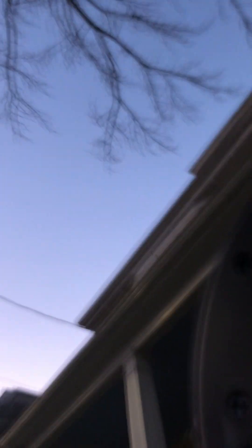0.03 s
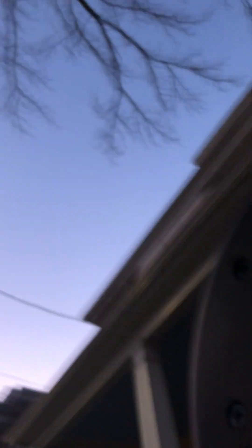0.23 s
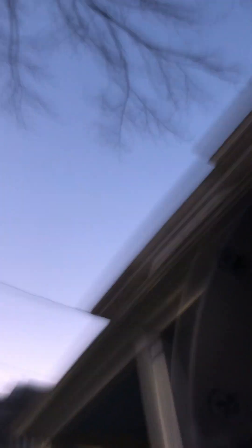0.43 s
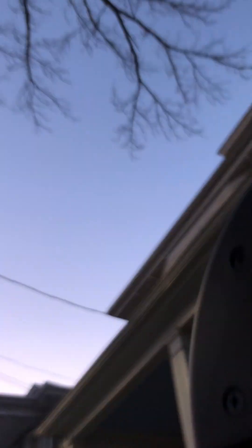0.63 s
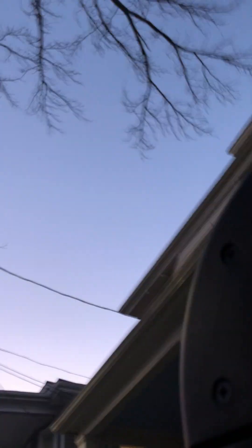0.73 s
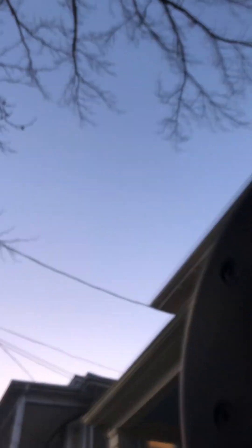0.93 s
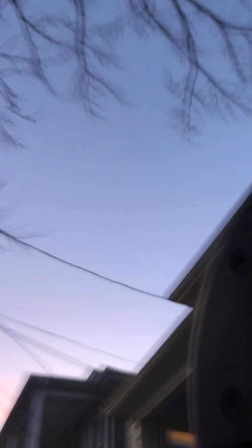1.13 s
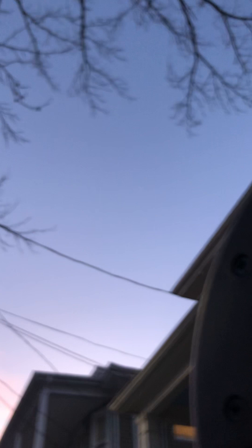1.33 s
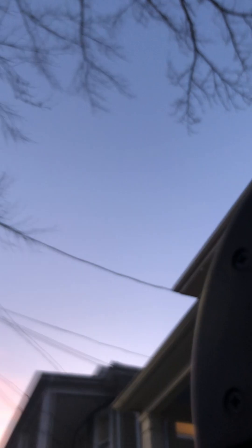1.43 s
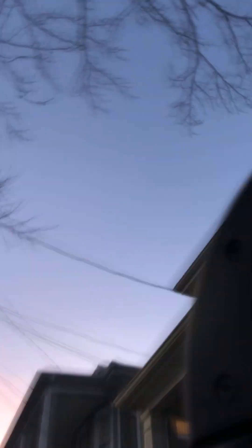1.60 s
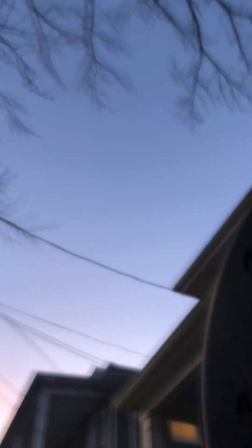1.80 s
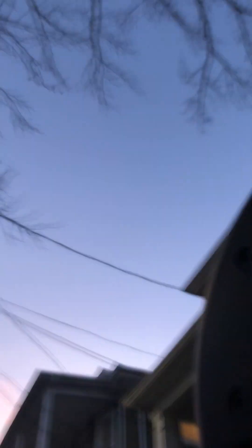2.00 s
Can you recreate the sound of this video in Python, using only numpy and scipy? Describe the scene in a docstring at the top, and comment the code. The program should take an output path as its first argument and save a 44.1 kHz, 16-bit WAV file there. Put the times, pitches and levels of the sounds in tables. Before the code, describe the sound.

A wheelchair rolls over rough pavement, close and dry, in quiet outdoor air. Low rumble carries rapid dull thuds from 0.1 to 0.5 s, with a sharp cluster of grit snaps near 0.37. A bright metal tick at 0.6, thud and loose clack at 0.8, then calmer rolling; a lighter rattle at 1.19. Snaps and ticks return around 1.6, hollow knocks from 1.73, heavy thuds near 1.95.

```python
"""A wheelchair rolls over rough pavement outdoors, heard from the chair itself.
Bumps are sinking tones with shudder, over a low rumble of coloured noise. Grit crackles and snaps,
wheels knock hollowly, small parts tick and two loose fittings clack as sums of decaying modes.
A faint squeak is a swelling tone. Quiet outdoor air and a brief scatter of echoes surround it."""
import sys
import numpy as np
from scipy import signal
from scipy.fft import rfft, irfft
from scipy.io import wavfile

SR = 44100
rng = np.random.default_rng(int(sys.argv[2]) if len(sys.argv) > 2 else 0)


def inscribe(sig):
    """Save sig as 16-bit PCM at rate SR to the path in sys.argv[1].

    A 1-D sig is mono; a 2-D sig holds one channel per row.
    Samples are clipped to [-1, 1] before scaling.
    """
    pcm = np.round(np.clip(np.atleast_2d(sig).T, -1, 1) * 32767)
    wavfile.write(sys.argv[1], SR, pcm.astype(np.int16))


N = 90493
TIME_S = np.arange(N) / SR

# Rolling rumble strength. Each row: time in seconds, level in dB.
ROLL_LEVEL = [(0, -31), (.06, -40.5), (.2, -34), (.46, -37.5), (.54, -42), (.72, -35.5), (.88, -45),
              (1.0, -35.5), (1.16, -49), (1.37, -48.5), (1.47, -39.5), (1.53, -45), (1.65, -41.5),
              (1.88, -37.5), (2.05, -39)]
# Rumble spectrum. Each row: frequency in Hz, relative level in dB.
RUMBLE_SPECTRUM = [(20, -103), (40, -9.5), (60, 13), (100, 2), (170, -1), (300, -16.5), (600, -27),
                   (1200, -61.5), (16000, -98)]

# Fine crackle strength, before clumping. Each row: time in seconds, level in dB.
CRACKLE_LEVEL = [(0, -69.5), (.1, -60.5), (.23, -63.5), (.27, -61), (.345, -75.5), (.375, -54), (.405, -61),
                 (.425, -60), (.49, -62.5), (.56, -62.5), (.66, -67.5), (.88, -69.5), (.96, -61),
                 (1.02, -70), (1.11, -59.5), (1.28, -70.5), (1.44, -63.5), (1.56, -74), (1.63, -59),
                 (1.80, -67.5), (1.87, -56), (1.96, -61.5), (2.05, -59.5)]
# Spectrum of hiss, snaps and cracks. Each row: frequency in Hz, relative level in dB.
GRIT_SPECTRUM = [(300, 19.5), (900, 5.5), (2500, 6.5), (4000, 5.5), (7000, 0.5), (10000, -1),
                 (16000, -13.5)]
# Grit snapping under the tyres. Each row: start in seconds, level in dB, resonance in Hz.
SNAPS = [(.0670, -36, 11100), (0.079, -33.5, 4850), (0.0966, -36.5, 9000), (0.122, -43, 9000),
         (.1900, -49, 5500), (0.261, -43, 3020), (.2690, -41.5, 5100), (0.274, -38, 4900),
         (0.3576, -26, 3120), (0.362, -27, 2650), (.3682, -20.5, 9500), (0.375, -26.5, 2820),
         (0.3759, -31, 3150), (0.387, -32, 2500), (0.3905, -38.5, 2290), (0.4417, -33, 8500),
         (.4562, -38, 6100), (0.4685, -38.5, 7850), (0.526, -37.5, 6050), (0.5399, -32, 5500),
         (0.545, -34.5, 2230), (.5746, -57, 9000), (0.635, -43.5, 2960), (1.07, -40.5, 5000),
         (1.0887, -42, 4000), (1.482, -45.5, 5030), (1.5494, -43.5, 4170), (1.6117, -28.5, 7350),
         (1.6334, -37, 6440), (1.6613, -36, 3500), (1.6895, -32, 4070), (1.8410, -34.5, 4300),
         (1.854, -32, 1600), (1.8705, -38, 6200), (1.9142, -36.5, 3700), (1.953, -48, 6900)]

# Hollow knock spectrum. Each row: frequency in Hz, relative level in dB.
KNOCK_SPECTRUM = [(200, 3), (500, 6), (680, 5.5), (860, 4), (1050, -3.5), (1270, 2.5), (1550, -7.5),
                  (3500, -17.5), (16000, -59)]
# Hollow knocks of the wheels. Each row: start in seconds, level in dB, resonance in Hz.
KNOCKS = [(0.312, -47.5, 900), (.3495, -40, 635), (0.417, -43, 610), (0.575, -40, 432), (0.693, -42.5, 920),
          (1.108, -35, 1110), (1.3315, -45.5, 574), (1.7303, -35, 950), (1.8171, -37.5, 1130),
          (1.857, -39, 840), (1.877, -48, 1050)]

# Outdoor air spectrum. Each row: frequency in Hz, relative level in dB.
AIR_SPECTRUM = [(30, -8), (300, -5), (900, 13), (1400, 3), (2200, -8), (5000, -21.5), (16000, -20.5)]

# Bumps through the frame. Each row: start in seconds, level in dB, starting pitch in Hz,
# decay time constant in seconds.
BUMPS = [(0.077, -23.5, 232, 0.011), (0.136, -15.5, 492, 0.0057), (0.151, -19, 121, 0.022),
         (0.182, -20.5, 160, 0.014), (0.2, -16.5, 226, 0.0098), (.212, -24, 100, 0.0073),
         (.273, -30, 350, 0.0085), (0.323, -23, 81, 0.013), (0.3472, -18.5, 338, 0.0098),
         (.392, -23, 90.4, 0.012), (0.445, -20, 251, 0.013), (0.462, -20.5, 102.6, 0.01),
         (0.624, -20, 215, 0.014), (0.636, -19.5, 221, 0.014), (0.73, -30, 255, 0.025),
         (0.803, -17.5, 100.4, 0.014), (0.939, -24.5, 236, 0.0058), (0.951, -28.5, 172, 0.019),
         (0.992, -27, 212, 0.012), (1.1829, -27.5, 416, 0.0095), (1.215, -29.5, 117.4, 0.024),
         (1.272, -29.5, 390, 0.0086), (1.284, -28, 85, 0.02), (1.569, -30, 162, 0.0056),
         (1.59, -28, 120, 0.021), (1.613, -26.5, 68.4, 0.018), (1.73, -34, 118.5, 0.049),
         (1.819, -34, 101, 0.038), (1.926, -29.5, 314, 0.012), (1.938, -17.5, 107.4, 0.018),
         (1.963, -28.5, 262, 0.011), (1.971, -15, 111, 0.0084), (2.005, -29, 109, 0.036)]

# Small metal parts ticking. Each row: start in seconds, level in dB.
TICKS = [(.4485, -33.5), (.5957, -19.5), (.6022, -38), (1.6236, -25.5), (1.6262, -29.5)]
# Modes of the parts, before each blow's slight flattening. Each row: nominal frequency in Hz,
# relative level in dB, 60 dB decay time in seconds.
PIN_MODES = [(5200, -5.5, 0.0025), (5640, -2, 0.004), (7000, -0.5, 0.0017), (10370, -9.5, 0.0049),
             (12200, -3, 0.0024), (15100, -10, 0.0021)]

# Blows on the loose bracket. Each row: start in seconds, level in dB.
BRACKET_HITS = [(.8096, -21.5), (.8278, -52.5)]
# Bracket modes. Each row: nominal frequency in Hz, relative level in dB, 60 dB decay in seconds.
BRACKET_MODES = [(931, -2.5, 0.022), (1436, -6.5, 0.015), (1946, 0, 0.014), (2540, -7, 0.013),
                 (3800, 4.5, 0.009), (4140, 7.5, 0.0053), (4840, -6.5, 0.017), (5350, -5.5, 0.0099),
                 (6100, -0.5, 0.0051), (7310, -10.5, 0.013), (11000, -14, 0.0031)]

# Blows on the loose footrest. Each row: start in seconds, level in dB.
FOOTREST_HITS = [(1.1891, -27.5), (1.1942, -39.5), (1.2008, -45.5), (1.2273, -49)]
# Footrest modes. Each row: nominal frequency in Hz, relative level in dB, 60 dB decay in seconds.
FOOTREST_MODES = [(291, -1.5, 0.038), (755, -5.5, 0.028), (1665, -10, 0.025), (2300, 5.5, 0.0077),
                  (2710, 4.5, 0.0088), (3080, 4.5, 0.01), (4300, 0, 0.0073), (5500, -1.5, 0.0089),
                  (6400, -3, 0.0088), (7380, -2.5, 0.0099), (8700, 1.5, 0.0063), (11260, 1, 0.0023)]

# Faint squeaks of the chair. Each row: start in seconds, length in seconds, pitch in Hz, level in dB.
SQUEAKS = [(1.233, 0.028, 1270, -49)]

PEAK_DB, PEAK_OCTAVES = 8, 0.53  # resonance in each snap or knock
GRAINS_PER_S, GRAIN_SPREAD_DB = 5600, 5.5  # rate where the tyres scrub hardest
GRAIN_LOW_HZ, GRAIN_HIGH_HZ, GRAIN_DECAY_CYCLES = 1027, 9000, 0.55
GRAIN_DB, HISS_DB = -3, -2.5  # relative to the crackle curve
CLUMP_DB, CLUMP_S = 3, 0.0041  # rms swing; half-width of the smoothing window
PATTER_PER_S, PATTER_DB = 120, -61.5
KNOCK_RISE_S, KNOCK_DECAY_S = 0.00028, 0.0099
AIR_DB = -62
SNAP_RISE_S, SNAP_DECAY_S = 0.00083, 0.0016
FRAME_HZ = 50  # each thud sinks towards the frame's lowest note
RISE_CYCLES, SAG_PER_DECAY = 0.52, 1.415  # short, high bumps rise and sink fastest
SHUDDER_DB, SHUDDER_HZ = -2, 339
CRACK_DECAY_S = 0.0016
PIN_CRACK_DB, BRACKET_CRACK_DB, FOOTREST_CRACK_DB = -23, -15.5, 2  # relative to the blow
ECHO_DB, ECHO_DECAY_S = -16.5, 0.0082
LOW_CUT_HZ, HIGH_CUT_HZ = 32, 16300


def amp(db):
    """Decibels to gain."""
    return 10 ** (np.asarray(db) / 20)


def unit(x):
    """Scales to rms 1."""
    return x / np.sqrt(np.mean(x ** 2) + 1e-20)


def add(mix, start_s, sound):
    """Mixes a sound in at its start time."""
    part = mix[max(round(start_s * SR), 0):][:len(sound)]
    part += sound[:len(part)]


def level(curve):
    """Gain over time, interpolated in dB between curve points."""
    return amp(np.interp(TIME_S, *np.transpose(curve)))


def coloured_noise(count, spectrum, peak_hz=None):
    """Noise of rms 1, shaped by a spectrum and an optional resonance."""
    octave = np.log2(np.fft.rfftfreq(count, 1 / SR) + 1)
    hz, db = np.transpose(spectrum)
    gain_db = np.interp(octave, np.log2(hz), db)
    if peak_hz is not None:
        gain_db = gain_db + PEAK_DB * np.exp(-((octave - np.log2(peak_hz)) / PEAK_OCTAVES) ** 2)
    return unit(irfft(rfft(rng.standard_normal(count)) * amp(gain_db), count))


def burst_shape(t, rise_s, decay_s):
    """Linear rise under an exponential decay."""
    return np.minimum(t / rise_s, 1) * np.exp(-t / decay_s)


def noise_bursts(rows, spectrum, shape):
    """Places one resonant noise burst per row."""
    out = np.zeros(N)
    for start_s, db, peak_hz in rows:
        add(out, start_s, amp(db) * shape * coloured_noise(len(shape), spectrum, peak_hz))
    return out


def tyre_rumble():
    """Low noise of the rolling tyres, its strength following the roll curve."""
    return level(ROLL_LEVEL) * coloured_noise(N, RUMBLE_SPECTRUM)


def grains(scrub, bands=24):
    """Tiny clicks of many sizes and pitches, denser the harder the tyres scrub."""
    out, t = np.zeros(N), TIME_S[:SR // 100]
    chance = scrub / scrub.max() * GRAINS_PER_S / bands / SR
    for hz in np.geomspace(GRAIN_LOW_HZ, GRAIN_HIGH_HZ, bands):
        size = amp(GRAIN_SPREAD_DB * np.minimum(rng.exponential(1, N), 4))
        impulses = size * (rng.random(N) < chance)
        click = unit(t * np.sin(2 * np.pi * hz * t) * np.exp(-t * hz / GRAIN_DECAY_CYCLES))
        out += signal.oaconvolve(impulses, click)[:N]
    return unit(out)


def fine_crackle():
    """Grains over tyre friction hiss; the scrubbing comes in short uneven clumps."""
    window = np.hanning(round(2 * CLUMP_S * SR))
    clumps = unit(np.convolve(rng.standard_normal(N), window, "same"))
    scrub = level(CRACKLE_LEVEL)
    hiss = coloured_noise(N, GRIT_SPECTRUM)
    return scrub * amp(CLUMP_DB * clumps) * (amp(GRAIN_DB) * grains(scrub) + amp(HISS_DB) * hiss)


def pavement_patter():
    """Random faint knocks from the grain of the pavement, as noise under many small decays."""
    shape = burst_shape(TIME_S[:SR // 8], KNOCK_RISE_S, KNOCK_DECAY_S)
    stones = rng.random(N) * (rng.random(N) < PATTER_PER_S / SR)
    envelope = unit(signal.oaconvolve(stones, shape)[:N])
    return amp(PATTER_DB) * envelope * coloured_noise(N, KNOCK_SPECTRUM)


def outdoor_air():
    """Quiet steady coloured noise."""
    return amp(AIR_DB) * coloured_noise(N, AIR_SPECTRUM)


def grit_snaps():
    """Larger grit snaps as short resonant noise bursts."""
    return noise_bursts(SNAPS, GRIT_SPECTRUM, burst_shape(TIME_S[:SR // 16], SNAP_RISE_S, SNAP_DECAY_S))


def bump(db, hz, decay_s):
    """A thud whose pitch sinks as the quick flexing dies and the whole frame sways."""
    t = TIME_S[:SR // 4]
    flex = np.exp(-t / (SAG_PER_DECAY * decay_s))
    sway = np.sin(2 * np.pi * np.cumsum(FRAME_HZ + (hz - FRAME_HZ) * flex) / SR)
    # upper edge of the shudder: geometric mean of pitch and SHUDDER_HZ
    soften = signal.butter(2, np.sqrt(hz * SHUDDER_HZ), fs=SR, output="sos")
    softened = signal.sosfilt(soften, rng.standard_normal(len(t)))
    shudder = unit(signal.sosfilt(soften, softened))
    shape = (1 - np.exp(-(t * hz / RISE_CYCLES) ** 2)) * np.exp(-t / decay_s)
    return amp(db) * shape / shape.max() * (sway + amp(SHUDDER_DB) * shudder * flex)


def frame_bumps():
    """Pavement bumps thud through the frame."""
    out = np.zeros(N)
    for start_s, db, hz, decay_s in BUMPS:
        add(out, start_s, bump(db, hz, decay_s))
    return out


def wheel_knocks():
    """Short hollow knocks of the wheels, as resonant noise bursts."""
    shape = burst_shape(TIME_S[:SR // 8], KNOCK_RISE_S, KNOCK_DECAY_S)
    return noise_bursts(KNOCKS, KNOCK_SPECTRUM, shape)


def modal_ring(modes, t):
    """Sum of decaying modes of alternating sign, each drawn 1.2 to 2.8 % below nominal."""
    ring = np.zeros(len(t))
    for k, (hz, db, t60_s) in enumerate(modes):
        tone = np.sin(2 * np.pi * hz * rng.uniform(0.972, 0.988) * t)
        ring += (-1) ** k * amp(db - 60 * t / t60_s) * tone
    return ring


def struck(hits, modes, crack_db):
    """Each blow is a short noise crack and the ring of the part's modes."""
    out, t = np.zeros(N), TIME_S[:SR // 10]
    for start_s, db in hits:
        ring = modal_ring(modes, t)
        crack = coloured_noise(len(t), GRIT_SPECTRUM) * np.exp(-t / CRACK_DECAY_S)
        add(out, start_s, amp(db) * (ring + amp(crack_db) * crack))
    return out


def metal_ticks():
    """Small metal parts ring very briefly."""
    return struck(TICKS, PIN_MODES, PIN_CRACK_DB)


def bracket_clacks():
    """The loose bracket's modes, struck with a faint crack."""
    return struck(BRACKET_HITS, BRACKET_MODES, BRACKET_CRACK_DB)


def footrest_clacks():
    """The loose footrest's modes, struck with a strong crack."""
    return struck(FOOTREST_HITS, FOOTREST_MODES, FOOTREST_CRACK_DB)


def squeaks():
    """A faint squeak: a pure tone that swells and fades."""
    out = np.zeros(N)
    for start_s, length_s, hz, db in SQUEAKS:
        t = np.arange(0, length_s, 1 / SR)
        add(out, start_s, amp(db) * np.hanning(len(t)) * np.sin(2 * np.pi * hz * t))
    return out


def reflections(x):
    """Scatter from the ground and the chair: convolution with briefly decaying noise."""
    t = TIME_S[:SR // 5]
    tail = rng.standard_normal(len(t)) * np.exp(-t / ECHO_DECAY_S)
    return amp(ECHO_DB) * signal.fftconvolve(x, tail / np.linalg.norm(tail))[:N]


def scene():
    """Rumble, thuds and echoing rattles over quiet outdoor air."""
    grit = fine_crackle() + grit_snaps()
    wheels = pavement_patter() + wheel_knocks() + squeaks()
    fittings = metal_ticks() + bracket_clacks() + footrest_clacks()
    rattle = grit + wheels + fittings
    return (tyre_rumble() + frame_bumps() + rattle + reflections(rattle) + outdoor_air())[None]


def record(dry):
    """The microphone's bass roll-off and the upper band limit."""
    low_cut = signal.butter(2, LOW_CUT_HZ, "high", fs=SR, output="sos")
    thin = signal.sosfilt(low_cut, dry)
    band_limit = signal.firwin(511, HIGH_CUT_HZ, window=("kaiser", 9), fs=SR)
    return signal.oaconvolve(thin, band_limit[None], "same")


dry = scene()
out = record(dry)
inscribe(out)
```